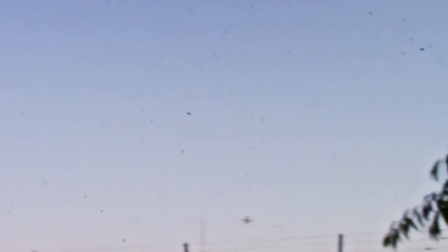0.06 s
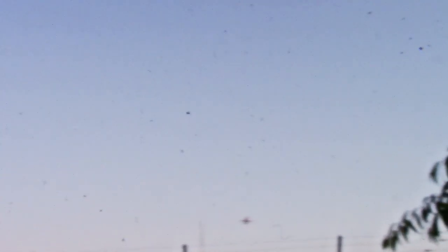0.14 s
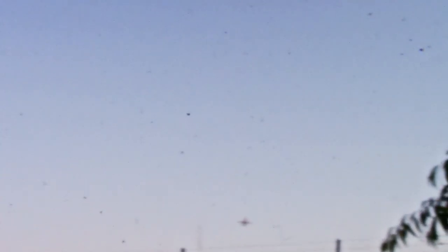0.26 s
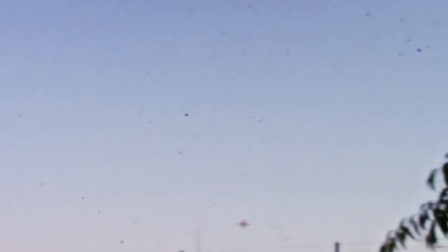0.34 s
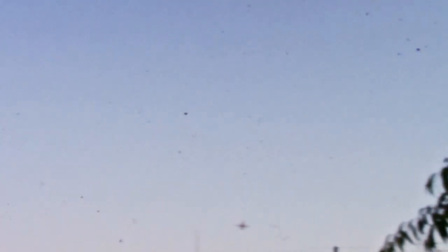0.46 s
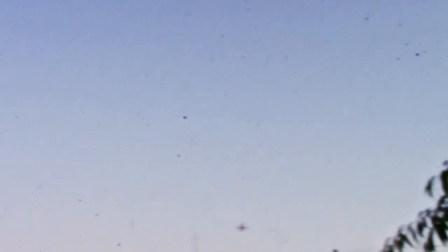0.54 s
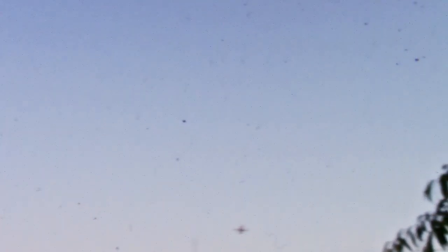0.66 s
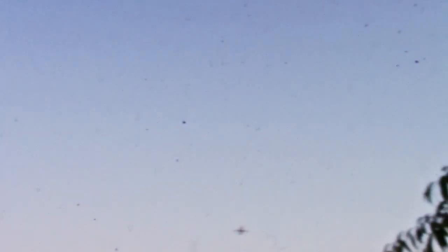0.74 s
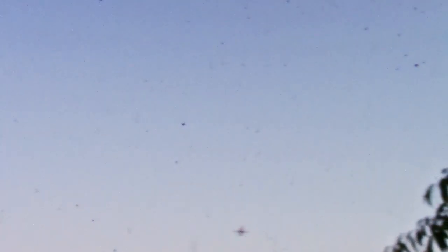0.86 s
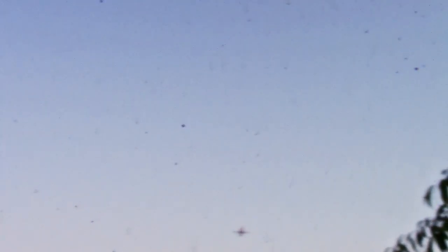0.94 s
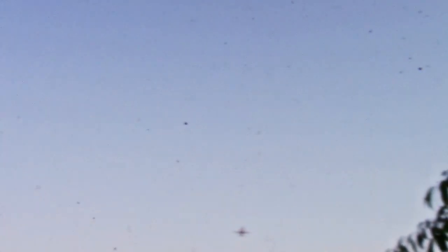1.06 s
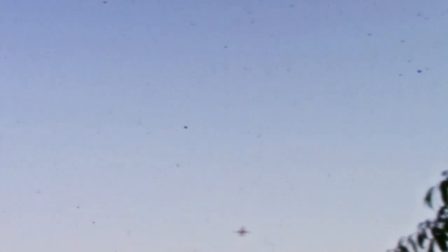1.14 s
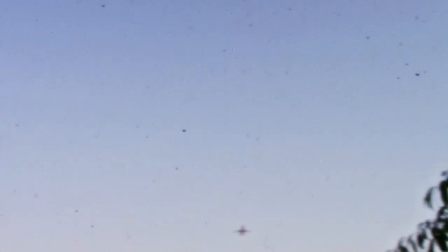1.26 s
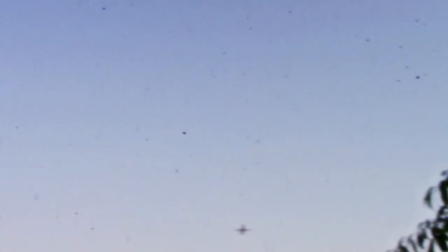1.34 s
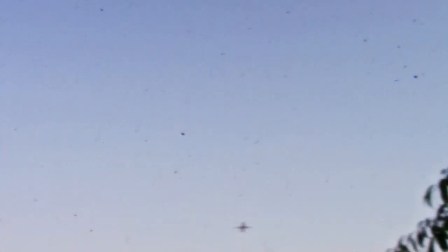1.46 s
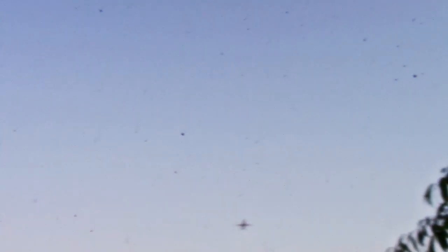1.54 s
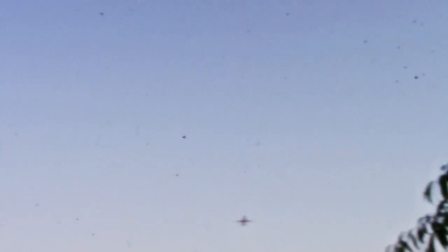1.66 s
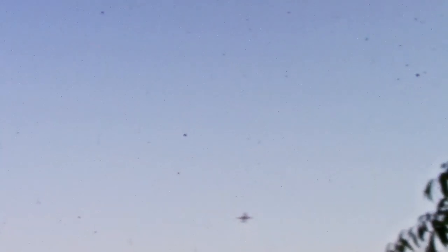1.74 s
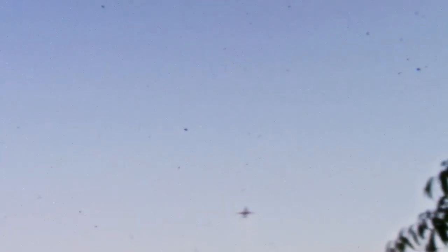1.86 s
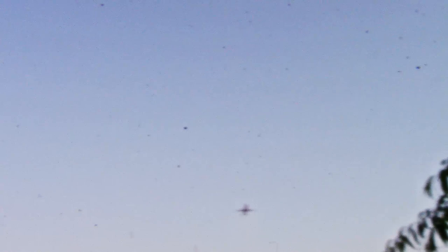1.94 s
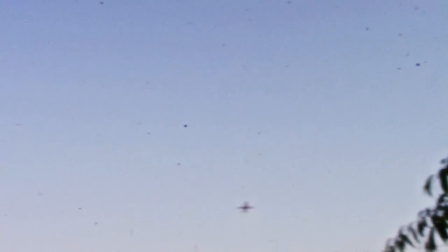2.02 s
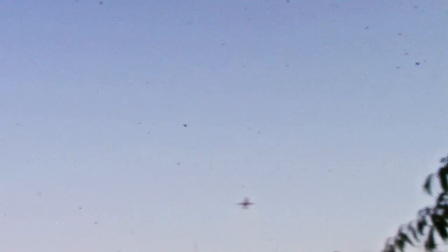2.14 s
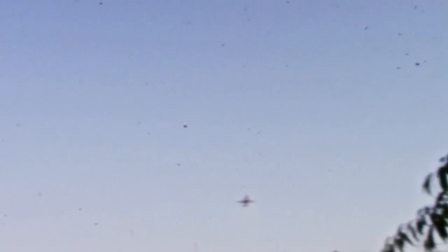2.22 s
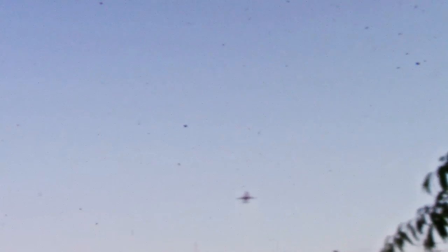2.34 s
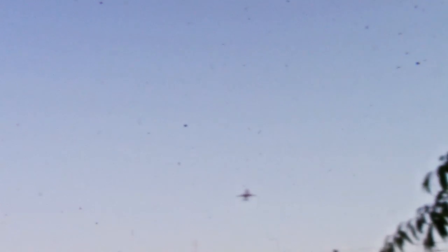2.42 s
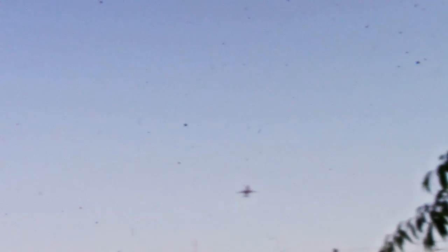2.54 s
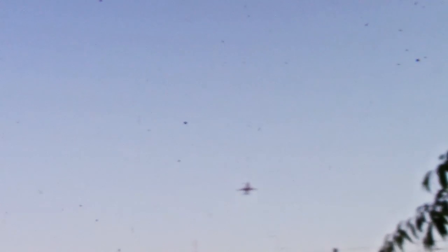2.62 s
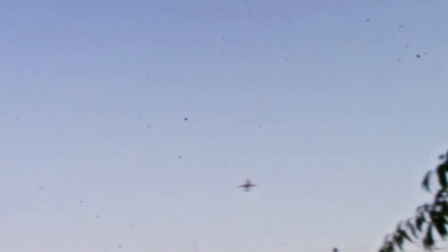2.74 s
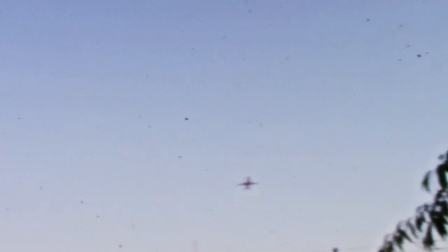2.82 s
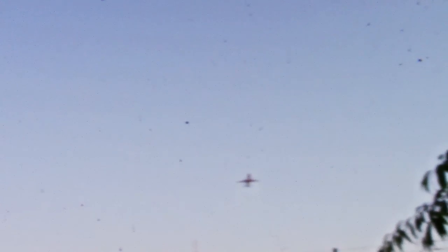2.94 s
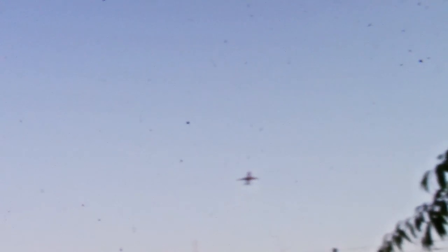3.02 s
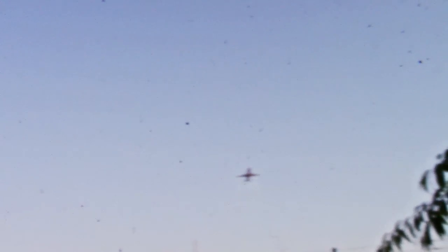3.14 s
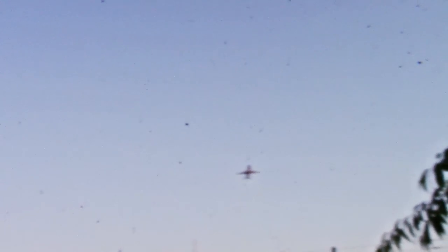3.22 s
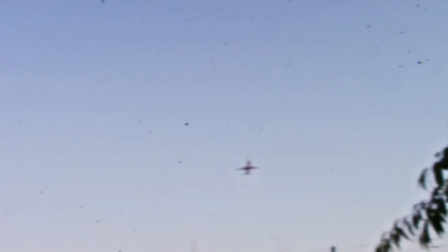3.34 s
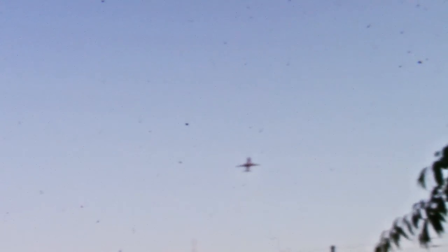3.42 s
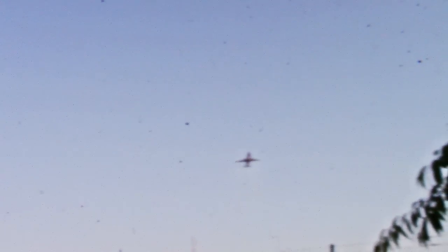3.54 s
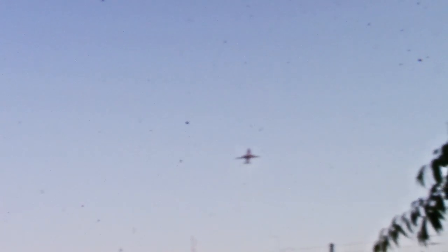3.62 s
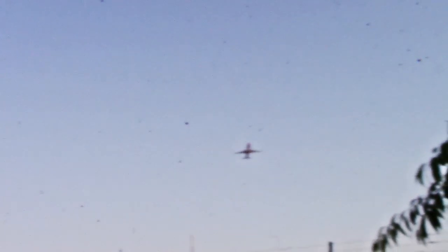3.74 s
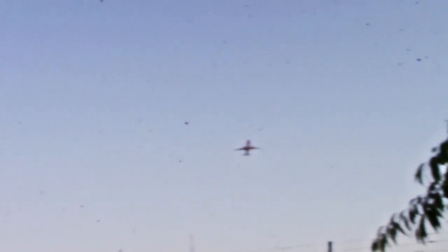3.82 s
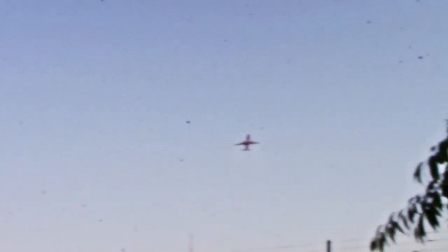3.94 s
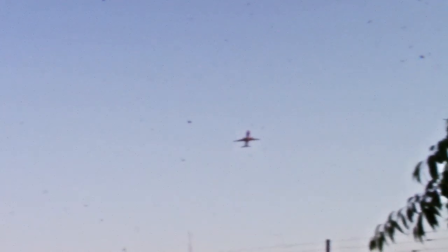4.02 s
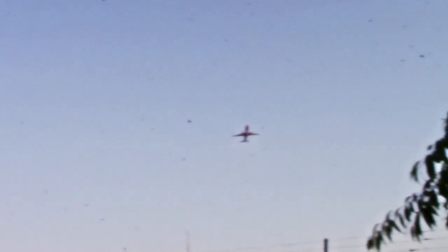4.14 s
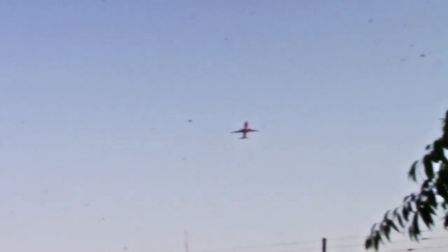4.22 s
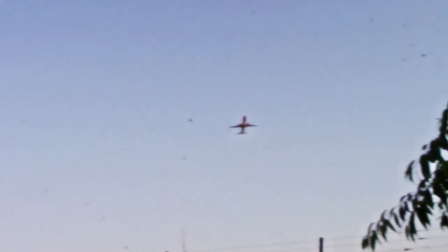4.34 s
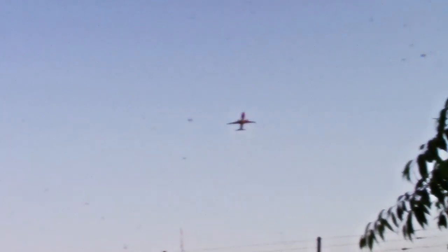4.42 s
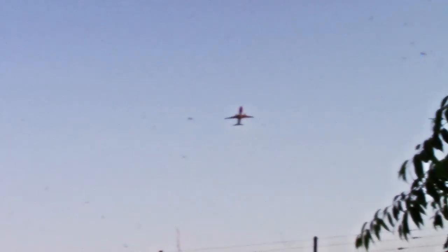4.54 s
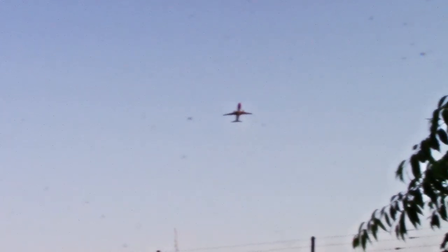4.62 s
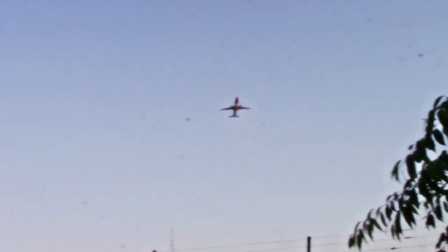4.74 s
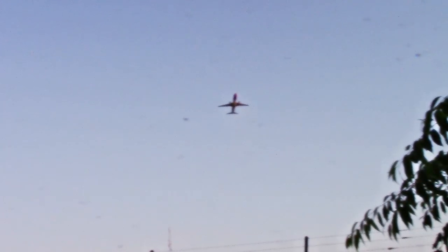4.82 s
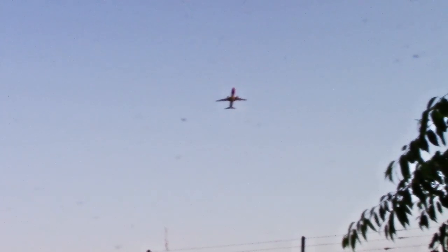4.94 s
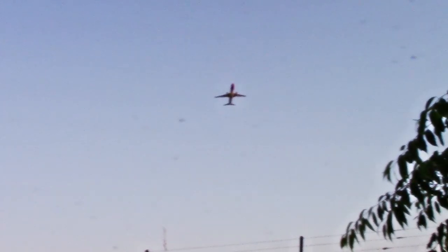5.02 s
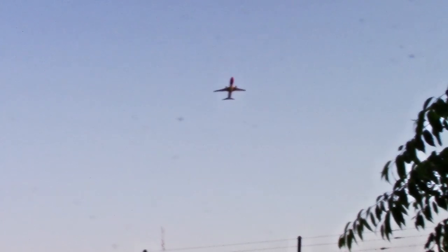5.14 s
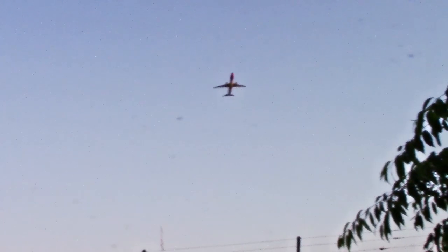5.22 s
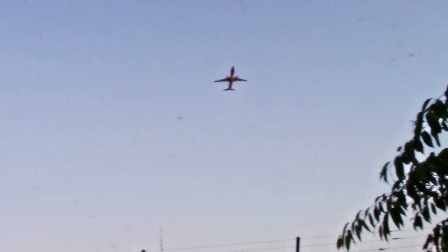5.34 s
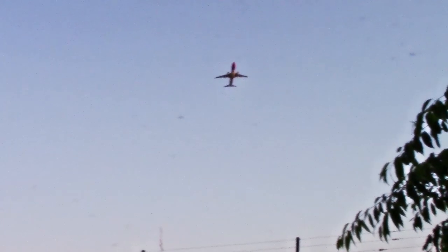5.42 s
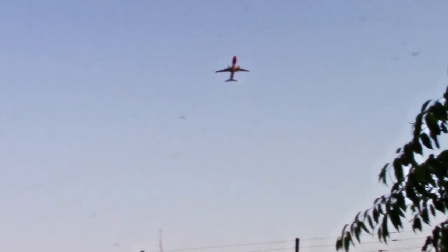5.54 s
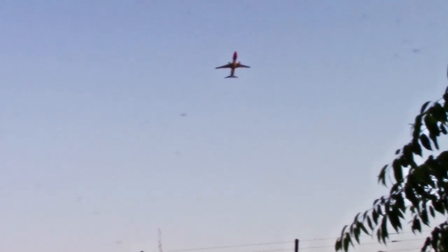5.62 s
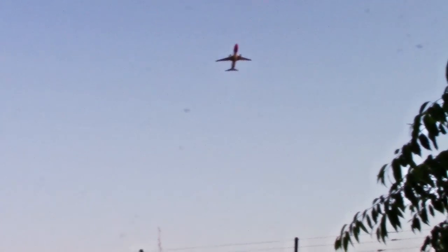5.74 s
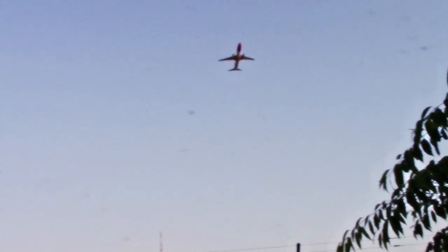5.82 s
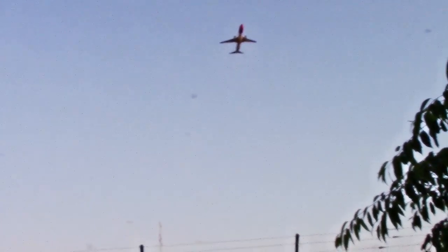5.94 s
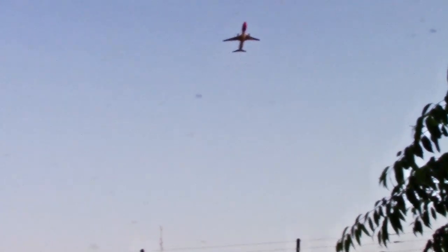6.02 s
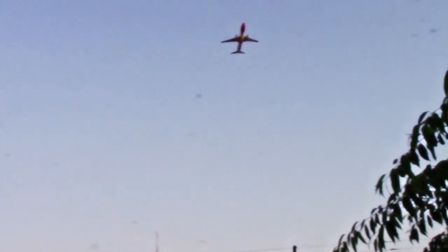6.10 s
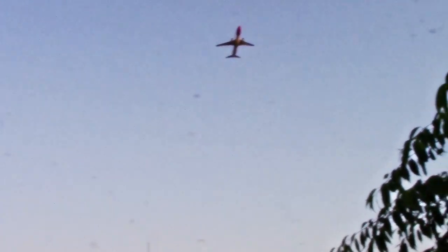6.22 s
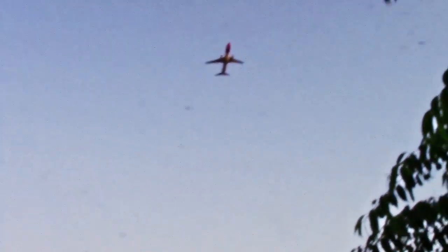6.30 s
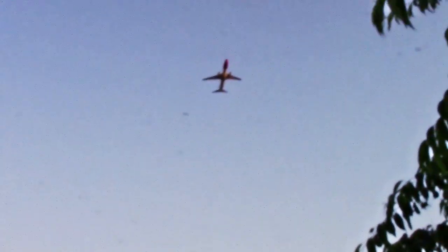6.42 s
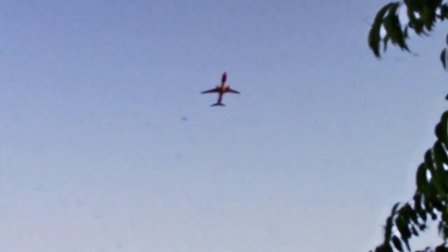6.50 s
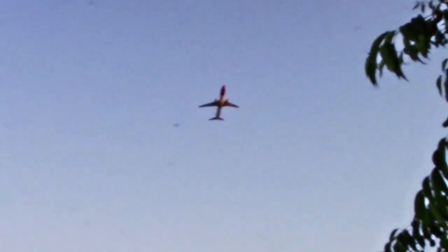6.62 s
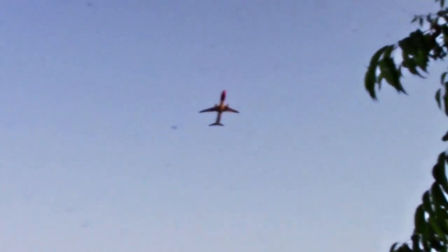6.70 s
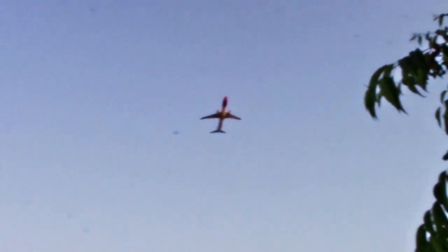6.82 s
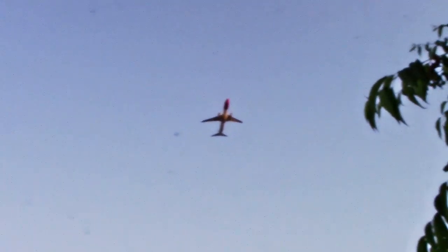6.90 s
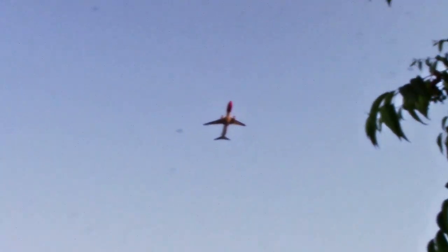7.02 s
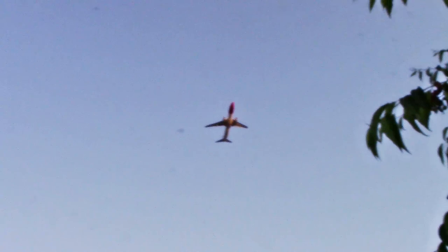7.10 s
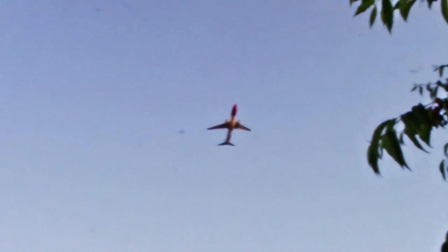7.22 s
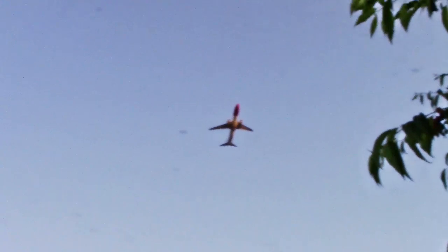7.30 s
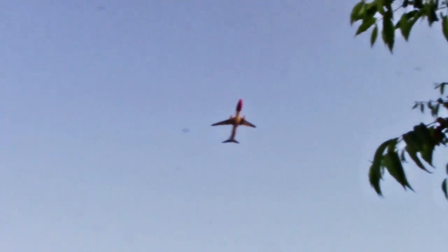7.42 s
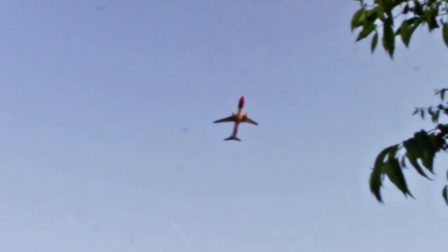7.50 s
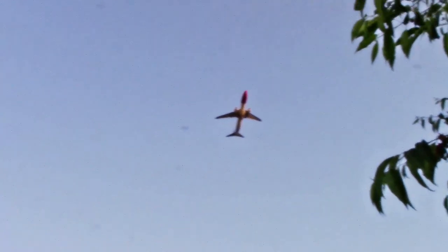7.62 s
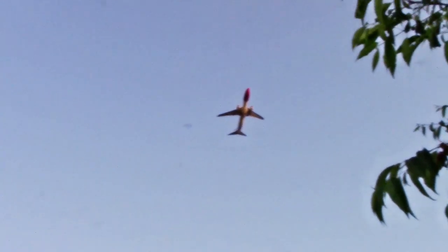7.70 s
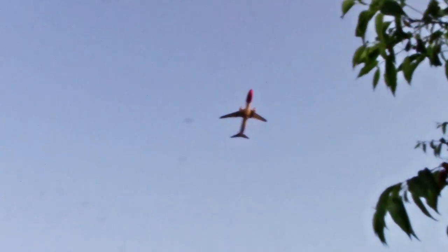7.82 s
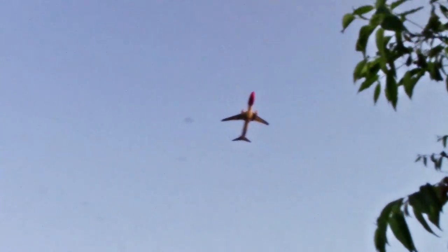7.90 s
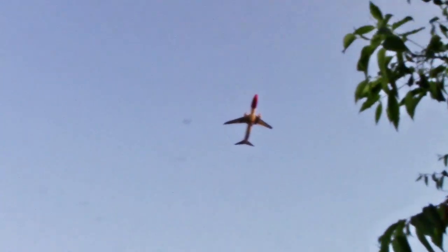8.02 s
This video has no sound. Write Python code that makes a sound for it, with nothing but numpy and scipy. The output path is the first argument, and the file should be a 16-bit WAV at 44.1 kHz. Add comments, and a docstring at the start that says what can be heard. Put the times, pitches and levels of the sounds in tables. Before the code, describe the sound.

Outdoors, a low jet comes closer, rough gusting roar growing loud, with a wavering turbine whine and buzz sliding downward as it nears overhead.

```python
"""Airliner low over heath

A twin-engine jet airliner comes in low over open heath and is almost overhead at the end.
Its roar is filtered noise, surging through turbulent air; a lagging ground echo combs it into a falling sweep.
The fans add a blade whine and a buzz of shaft orders, sine tones that sink with the Doppler shift.
Jet, fan and hiss levels follow the shrinking range. Steady noise is the quiet air, with a few faint peeps."""
import sys
import numpy as np
from scipy import signal
from scipy.fft import rfft, irfft, next_fast_len
from scipy.io import wavfile
from scipy.ndimage import uniform_filter1d, minimum_filter1d, map_coordinates

SR = 44100
rng = np.random.default_rng(int(sys.argv[2]) if len(sys.argv) > 2 else 0)


def transcribe(signal):
    """Save signal, clipped to [-1, 1], as a 16-bit WAV file at the path in sys.argv[1]."""
    frames = np.atleast_2d(signal).T
    limited = np.clip(frames, -1, 1)
    pcm = np.round(limited * 32767).astype(np.int16)
    wavfile.write(sys.argv[1], SR, pcm)


N = 355446
TIME = np.arange(N) / SR

# the approach, with the fan shaft speed as heard: time_s, shaft_hz, range_km
FLIGHT = [(0, 98.9, 1.1), (2, 99.15, .9), (3.5, 99, .74), (4.5, 98.4, .62), (5.25, 97.6, .54),
          (5.8, 96.75, .48), (6.3, 95.8, .42), (6.7, 94.8, .38), (7.3, 93.2, .32), (7.7, 91.6, .28),
          (8.06, 90, .25)]
# eddies focus the roar into surges, as level changes: centre_s, half_length_s, jet_db, rush_db, hiss_db
SURGES = [(0, .18, 6, 7, 8), (1.2, 0.15, 2.5, 4, 6), (1.42, 0.14, 7, 6.5, 3.5), (1.72, .19, 7.5, 8.5, 5.5),
          (2.0, .14, 7, 2, 4), (2.22, .17, 10.5, 10.5, 6), (2.45, 0.2, 3.5, 2, 0.5), (3.1, 0.4, 2, 0.5, 0),
          (3.61, .15, 4.5, 3.5, 6.5), (3.85, 0.11, 3.5, 1, 2), (4.17, 0.2, 3.5, 6, 4),
          (4.4, 0.12, 1.5, 2.5, 1), (4.59, 0.13, 2, 5.5, 5.5), (4.88, 0.16, 5, 5, 4),
          (5.22, 0.15, 3.5, 5.5, 2.5), (5.79, 0.15, 7, 5, 9), (6.18, 0.077, 8, 3.5, 3.5),
          (6.39, 0.18, 7, 5, 5.5), (6.8, 0.14, 4, 5.5, 7.5), (7.26, .1, 1, 5.5, 7),
          (7.64, 0.13, -0.5, 2, 3.5), (8.0, 0.17, -1, -0.5, 1)]


def roar(rumble_trim_db=-1.9, jet_trim_db=-1.72, rush_trim_db=-1, flutter_db=1.03, jet_flutter_db=.5,
         hiss_flutter=1.04):
    """Turbulent exhaust and fan noise: long waves pass the eddies calmly, short ones surge and flutter."""
    # level of the exhaust rumble before its trim: time_s, level_db
    rumble_levels = [(0.0, -34), (0.06, -31.5), (0.38, -37.5), (1.88, -31), (2.99, -37), (5.14, -28),
                     (5.32, -32.5), (5.75, -22.5), (6.06, -24.5), (6.22, -20.5), (6.82, -23), (6.93, -26),
                     (7.14, -20.5), (7.52, -25), (8.01, -25.5), (8.06, -24)]
    range_km = curves(FLIGHT)[1]
    sound = echoes(through_air(range_km))

    def band(low_hz, high_hz):
        """Band-pass filtering: the noise between two edges, held at rms 1."""
        def response(hz):
            """Product of a low-pass and the complement of another."""
            return lowpass(hz, high_hz, order=5) ** 2 * (1 - lowpass(hz, low_hz, order=5) ** 2)
        return steady(filtered(sound, response))

    rumble = band(10, 400)
    jet = band(400, 1100)
    rush = band(1100, 3600)
    hiss = band(3600, 15000)
    jet_level, rush_level, hiss_level = roar_levels()
    # rush and hiss share one flutter
    flutter = flutter_db * wobble(24)
    rumble = rumble * amp(curves(rumble_levels)[0] + rumble_trim_db)
    jet = jet * amp(jet_level + jet_trim_db + jet_flutter_db * wobble(12))
    rush = rush * amp(rush_level + rush_trim_db + flutter)
    hiss = hiss * amp(hiss_level + hiss_flutter * flutter)
    return rumble + jet + rush + hiss


def through_air(range_km, loss_db_per_km=2.5, patchy_db=0.03):
    """Air absorption takes the treble with range; eddies focus the noise in very slight patches."""
    # shape of the engine noise before the air dulls it: frequency_hz, density_db (per Hz)
    engine_spectrum = [(30, -79), (85, -30), (115, -13), (165, -5), (215, 3), (300, 4.5), (430, -1.5),
                       (680, 5), (900, -1), (1400, -3.5), (2300, -4), (3200, -11), (4600, -22.5),
                       (6800, -21.5), (12500, -44)]
    hz, t, noise = signal.stft(rng.standard_normal(N), SR, nperseg=2048)
    # the loss per km is that at 1 kHz
    absorbed_db = loss_db_per_km * (hz[:, None] / 1000) ** (3 / 2) * np.interp(t, TIME, range_km)
    patches = uniform_filter1d(rng.standard_normal(noise.shape), size=30, axis=0)
    eddies = unit(uniform_filter1d(patches, size=8, axis=1))
    level_db = along(engine_spectrum, hz)[:, None] - absorbed_db + patchy_db * eddies
    return signal.istft(noise * amp(level_db), SR, nperseg=2048)[1][:N]


def echoes(x, far_share=0.19, near_share=0.6, phase_lag_rad=0.27, grazing_hz=1000, steep_hz=2000,
           wall_share=0.09, wall_hz=3500, bass_share=0.79, bass_hz=380):
    """Comb interference: soft heath returns the bass, lags in phase and soaks up treble; a wall adds more."""
    # lag of the echoes behind the sound they answer: time_s, ground_ms, wall_ms
    echo_lags = [(0, 1.12, 10.12), (1.5, 1.22, 10.12), (2.5, 1.38, 10.1), (3.5, 1.69, 10.1),
                 (4, 1.8, 10.13), (5, 2.3, 10.22), (6, 2.83, 10.36), (6.5, 3.3, 10.5), (7, 3.81, 10.7),
                 (7.5, 4.58, 10.9), (8.06, 5.3, 11.1)]
    ground_ms, wall_ms = curves(echo_lags)

    def ground(treble):
        """Reflection with frequency-dependent loss and a constant phase lag."""
        def response(hz):
            """Crossfade from the bass share to the treble gain, turned in phase."""
            bass = lowpass(hz, bass_hz, order=3) ** 2
            return (bass_share * bass + (1 - bass) * treble(hz)) * np.exp(-1j * phase_lag_rad)
        return filtered(x, response)

    # the treble loss is greatest at grazing angles
    grazing = ground(lambda hz: far_share * lowpass(hz, grazing_hz, order=2))
    from_above = ground(lambda hz: near_share * lowpass(hz, steep_hz, order=1))
    # the comb deepens as the plane climbs in the sky
    steep = np.sqrt(overhead())
    with_ground = x + delayed((1 - steep) * grazing + steep * from_above, ground_ms)
    dulled = filtered(with_ground, lambda hz: lowpass(hz, wall_hz, order=1))
    return with_ground + wall_share * delayed(dulled, wall_ms)


def roar_levels():
    """Spreading, beaming and focusing: levels in dB of jet roar, fan rush and hiss."""
    # growth of each on the approach: at_1km_db, halving_db (per halving of range), overhead_db
    jet_law = (-31, 11.56, -6.5)
    rush_law = (-32, 10.57, -5.5)
    hiss_law = (-50.5, 18.23, -12.5)
    return swells(SURGES) + [approach(*law) for law in (jet_law, rush_law, hiss_law)]


def approach(at_1km_db, halving_db, overhead_db):
    """Spreading and directivity: level in dB grows as range shrinks and is beamed ahead of the plane."""
    return at_1km_db - halving_db * np.log2(curves(FLIGHT)[1]) + overhead_db * overhead() ** 2


def overhead():
    """Geometry of the approach: 0 while the plane is far ahead, 1 when it is nearest."""
    range_km = curves(FLIGHT)[1]
    return ((range_km.max() - range_km) / np.ptp(range_km)) ** 2


def whine(surge_share=0.73, flicker_db=2.0, blur_rad=0.62, beat_hz=13, second_share=0.46,
          overtone_db=-14, overtone_flicker_db=2, blades=24):
    """Blade passing: shaft turns times blades give a tone and overtone; two engines a hair apart beat."""
    # growth on the approach: at_1km_db, halving_db (per halving of range), overhead_db
    whine_law = (-39.5, 10.26, -2.5)
    # flares and drop-outs of the tone: centre_s, half_length_s, change_db
    whine_swells = [(.55, 0.1, 3), (2.02, .05, -6), (2.2, 0.073, 7.5), (2.77, 0.045, -13), (3.6, 0.22, 5.5),
                    (3.93, 0.088, -7), (4.15, 0.23, 4.5), (4.63, 0.11, 11), (5.23, 0.042, 5.5),
                    (5.36, .08, -4.5), (5.77, .1, 6.5), (6.14, 0.044, 7.5), (6.46, 0.049, -8),
                    (6.62, 0.065, 0.5), (6.84, 0.074, 5), (6.93, .03, -5), (7.0, 0.078, 5.5),
                    (7.2, 0.045, 7), (7.3, 0.037, -4), (7.39, 0.058, 8.5), (7.55, .08, -7),
                    (8.03, 0.057, 7.5)]
    blade = blades * shaft_angle()
    first = np.sin(blade + blur_rad * wobble(45))
    second = np.sin(blade - 2 * np.pi * beat_hz * TIME + 2 * blur_rad * wobble(30))
    # the tone rides the surges of the fan rush, flares on its own and flickers
    level = approach(*whine_law) + surge_share * swells(SURGES)[1]
    level = level + swells(whine_swells)[0] + flicker_db * wobble(24)
    # the overtone crosses the air with the hiss and is lost overhead
    overtone_level = roar_levels()[2] + overtone_db + overtone_flicker_db * wobble(9)
    overtone = np.sin(2 * blade + 2 * blur_rad * wobble(45))
    overtone = (1 - overhead()) * amp(overtone_level) * overtone
    return unit(first + second_share * second) * amp(level) + overtone


def buzz_saw(waver_db=0.5, tenth_share=0.7, seventh_share=.3, fade_db=3, blur_rad=0.56):
    """Harmonics of shaft rotation from slightly unequal blades, level and phase shaken by the air."""
    # growth on the approach: at_1km_db, halving_db (per halving of range), overhead_db
    hum_law = (-41, 8.1, -0.85)
    howl_law = (-37, 6.9, -1.2)
    # swells and fades of the hum and the howl: centre_s, half_length_s, change_db
    hum_swells = [(1.47, .15, 10.5), (2.1, 0.41, 14.5), (3.05, 0.19, 11.5), (3.58, 0.22, 14),
                  (4.16, 0.047, 11), (4.45, 0.3, 9.5), (5.45, 0.31, -11), (6.35, 0.41, 14.5),
                  (7.38, 0.074, -9), (7.87, 0.091, 9)]
    howl_swells = [(0, 0.068, 11.5), (1.3, 0.2, 9), (1.72, .12, 15), (2.75, .5, -6), (3.8, .15, 9),
                   (4.5, 0.23, 9.5), (4.95, .15, -2), (5.35, 0.094, 6), (5.75, 0.23, 9.5)]
    # the other shaft orders that sound: order
    buzz_orders = [9, 12, 13, 14, 15, 18, 19, 22, 23, 25, 26, 30, 32, 34, 38, 39, 42, 54]
    # level of each of these against the fan rush, before the echoes: far_ahead_db, overhead_db
    buzz_levels = [(-18.5, -25.5), (-19, -20), (-14.5, -8), (-11, -12.5), (-16, -24), (-14.5, -16),
                   (-24, -19), (-18, -18.5), (-19.5, -28.5), (-37.5, -12), (-21.5, -19.5), (-32.5, -16),
                   (-35.5, -26.5), (-29.5, -21), (-41, -12.5), (-29.5, -21.5), (-38.5, -30), (-54, -23)]
    turn = shaft_angle()

    def tone(order):
        """Phase modulation: one shaft order with random fades and a phase blur that grows with order."""
        gain = amp(fade_db * wobble(5))
        start = 2 * np.pi * rng.random()
        return gain * np.sin(order * turn + start + blur_rad * (order / 10) ** (1 / 4) * wobble(25))

    # the strongest low orders swell and fade on their own
    hum_level = approach(*hum_law) + swells(hum_swells)[0] + waver_db * wobble(14)
    howl_level = approach(*howl_law) + swells(howl_swells)[0] + waver_db * wobble(14)
    hum = steady(tone(6) + seventh_share * tone(7)) * amp(hum_level)
    howl = steady((1 - overhead() / 2) * tenth_share * tone(10) + tone(11)) * amp(howl_level)
    # the inlet beams each order its own way, so the mix changes as the plane comes overhead
    near = overhead() ** 2
    buzz = np.zeros(N)
    for order, (far_db, near_db) in zip(buzz_orders, buzz_levels):
        buzz += amp(far_db + near * (near_db - far_db)) * tone(order)
    return hum + howl + echoes(buzz) * amp(roar_levels()[1])


def shaft_angle():
    """Phase is the integral of frequency: the fan shaft's turning as heard, in radians."""
    return 2 * np.pi * np.cumsum(curves(FLIGHT)[0]) / SR


def heath(floor_db=-57, peep_s=.02):
    """Shaped noise floor of quiet open country, with a few sine peeps under Gaussian envelopes."""
    # shape of the still air and microphone hiss: frequency_hz, density_db (per Hz)
    air_spectrum = [(25, -16.5), (60, -14.5), (120, 4), (400, 1.5), (2000, -10.5), (6000, -12),
                    (11500, -18.5), (13000, -37.5)]
    # the peeps at their peaks: centre_s, pitch_hz, level_db
    peep_notes = [(3.55, 7600, -68), (3.69, 7580, -61), (3.84, 7680, -61)]
    air = unit(filtered(rng.standard_normal(N), lambda hz: amp(along(air_spectrum, hz))))
    sound = amp(floor_db) * air
    # the peeps share one waver in phase
    waver = wobble(150)
    for s, pitch_hz, db in peep_notes:
        envelope = amp(db) * np.exp(-((TIME - s) / peep_s) ** 2)
        sound = sound + envelope * np.sin(2 * np.pi * pitch_hz * TIME + waver)
    return sound


def swells(rows, flat_top=2.24):
    """Superposed bells in dB, rises or dips: one curve for each column after time and half length."""
    t = TIME[::128]
    bells = 0
    for s, half_s, *db in rows:
        bells = bells + np.outer(db, np.exp(-np.minimum(np.abs(t - s) / half_s, 4) ** flat_top))
    return np.array([np.interp(TIME, t, column) for column in bells])


def amp(db):
    """The decibel is logarithmic: decibels to amplitude gain."""
    return np.exp(np.asarray(db) * (np.log(10) / 20))


def unit(x):
    """Power normalization: x at rms 1."""
    return x / np.sqrt(np.mean(x ** 2) + 1e-20)


def steady(x):
    """Running power normalization: x held near rms 1 over a moving half second."""
    return x / np.sqrt(np.abs(uniform_filter1d(x ** 2, SR // 2)) + 1e-20)


def along(points, hz):
    """Interpolation of (frequency, value) points on a logarithmic frequency axis."""
    f, v = np.transpose(points)
    return np.interp(np.log(hz + 1), np.log(f + 1), v)


def curves(rows):
    """Linear interpolation in time: one curve for each column after the time."""
    s, *columns = np.transpose(rows)
    return [np.interp(TIME, s, column) for column in columns]


def wobble(rate):
    """Band-limited random modulation: a smooth curve through rate random knots a second."""
    t = TIME[::64]
    knots = rng.standard_normal(int(N * rate / SR) + 4)
    return np.interp(TIME, t, map_coordinates(knots, [t * rate]))


def filtered(x, response, size=4096):
    """Convolution by spectral product with a response of frequency; mirrored ends keep the edges quiet."""
    m = next_fast_len(N + 2 * size)
    spectrum = rfft(np.pad(x, size, "reflect"), m)
    return irfft(spectrum * response(np.fft.rfftfreq(m, 1 / SR)), m)[size:size + N]


def lowpass(hz, edge_hz, order):
    """Butterworth magnitude: gain of a smooth low-pass."""
    return 1 / np.sqrt(1 + (hz / edge_hz) ** (2 * order))


def delayed(x, ms):
    """Propagation delay: x heard later by a moving lag, interpolated between samples."""
    return map_coordinates(x, [np.arange(N) - ms * SR / 1000], order=3, mode="mirror")


def scene():
    """Superposition of the airliner's sounds and the heath."""
    return (roar() + buzz_saw() + whine() + heath())[None]


def record(dry, knee=0.31, squash=0.05, top_hz=12700):
    """Asymmetric distortion slightly squashes positive crests; a quick limiter and a band-pass follow."""
    x = dry[0] - squash * np.maximum(dry[0] - knee, 0)
    needed_gain = np.minimum(1, .92 / (np.abs(x) + 1e-9))
    x = x * uniform_filter1d(minimum_filter1d(needed_gain, size=101), size=91)
    x = filtered(x, lambda hz: lowpass(hz, top_hz, order=40) * (1 - lowpass(hz, 15, order=2)))
    fade_in = np.minimum(1, TIME / .002)
    return (fade_in * x)[None]


dry = scene()
out = record(dry)
transcribe(out)
```